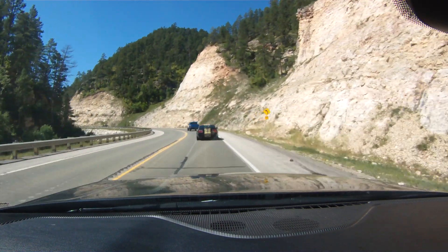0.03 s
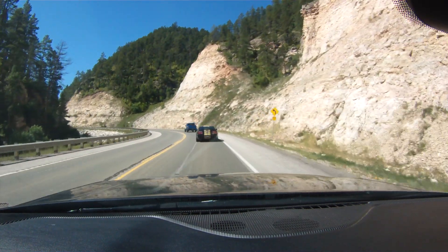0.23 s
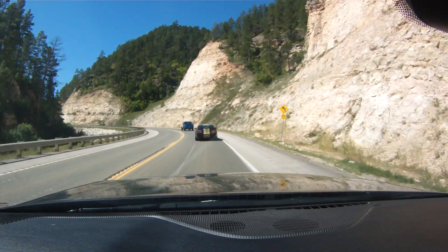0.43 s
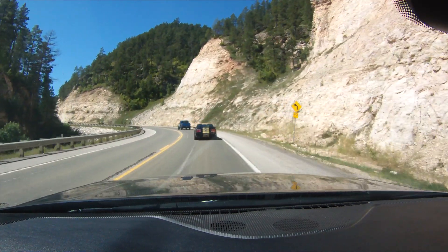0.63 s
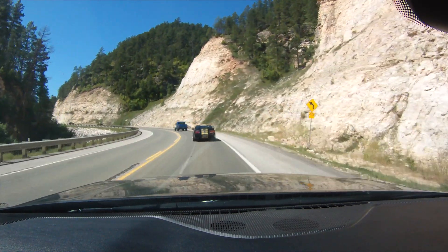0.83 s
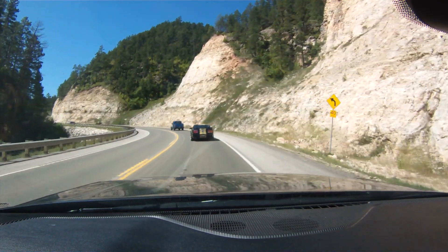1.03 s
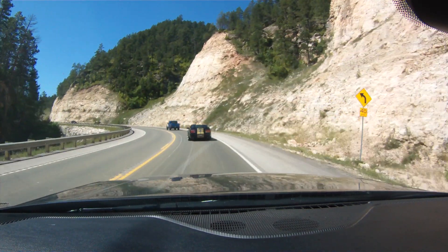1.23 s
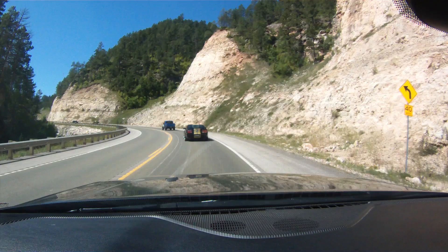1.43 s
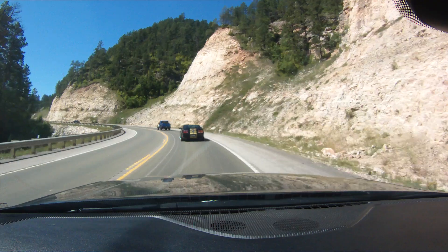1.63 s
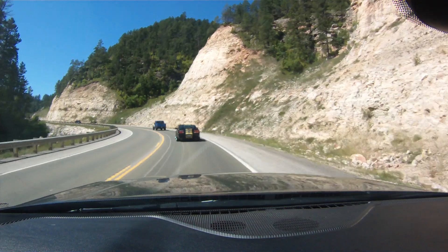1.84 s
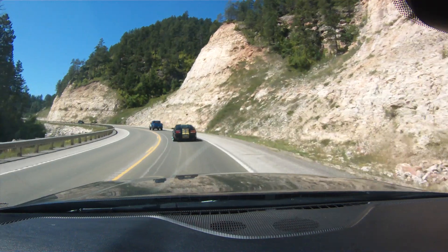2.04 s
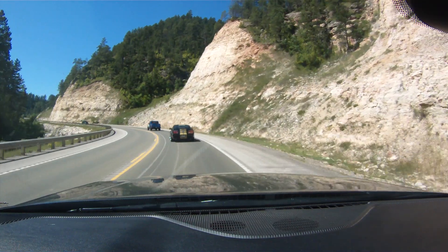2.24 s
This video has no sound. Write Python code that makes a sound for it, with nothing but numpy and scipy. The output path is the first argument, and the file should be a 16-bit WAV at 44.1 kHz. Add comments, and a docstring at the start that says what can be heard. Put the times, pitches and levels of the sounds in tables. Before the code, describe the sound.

Low, dull road roar inside a moving car, mostly below 500 Hz, with unsteady cabin hums and faint tyre and wind hiss. Fairly full at first, with soft body booms near 0.25 and 0.4 s; a tiny dropout with a soft click at 0.41 s. Quieter from 0.45 to 0.9 s, then it swells back by 1.4 s and stays uneven, with barely audible ticks near 2.07 and 2.25 s. Essentially centred.

```python
"""Highway drive heard inside a car

Noise shaped into road roar, tyre hiss and wind hiss swells and sinks, while noise in narrow resonances makes
the cabin hum, the body boom over soft bumps and the windscreen ring. Short dying bursts of band-limited noise
make faint ticks. Each channel adds its own faint hiss; both drop out together for a few milliseconds."""
import sys
import numpy as np
from scipy import signal
from scipy.fft import rfft, irfft
from scipy.io import wavfile
from scipy.ndimage import uniform_filter1d

SR = 44100
rng = np.random.default_rng(int(sys.argv[2]) if len(sys.argv) > 2 else 0)


def wav_record(signal):
    """Record a signal, one row per channel, as 16-bit PCM in the file named by sys.argv[1]."""
    frames = np.transpose(np.atleast_2d(signal))
    bounded = np.clip(frames, -1, 1)
    # unit amplitude maps onto the largest positive 16-bit level
    quanta = np.round(bounded * 32767).astype(np.int16)
    wavfile.write(sys.argv[1], SR, quanta)


N = 100680  # length in samples, about 2.3 s


def from_db(db):
    """Turn decibels into a plain multiplier."""
    return 10 ** (np.asarray(db) / 20)


def rms_one(x):
    """Scale a sound to an average strength (rms) of 1."""
    return x / np.sqrt(np.mean(x ** 2) + 1e-20)


def in_time(rows):
    """Draw straight lines between the rows of a table whose first column is time; one curve per column."""
    times, *columns = np.transpose(rows)
    return [np.interp(np.arange(N) / SR, times, column) for column in columns]


def drift(corner_hz):
    """A slow random wander with spread 1: noise smoothed by two equal low-pass stages."""
    step = 40  # samples between computed points
    pole = np.exp(-2 * np.pi * corner_hz * step / SR)
    noise = rng.standard_normal(N // step + 2002)
    slow = signal.lfilter([1], [1, -2 * pole, pole * pole], noise)[2000:]  # skip the filter's start
    return np.interp(np.arange(N) / step, np.arange(len(slow)), rms_one(slow))


def coloured(spectrum, flicker_db, fall_db):
    """Noise with a given spectrum, falling by fall_db per octave past its ends; its bands flicker in level."""
    hz, db = np.transpose(spectrum)
    low, high = np.log2(hz[0]), np.log2(hz[-1])
    octave = np.log2(np.fft.rfftfreq(N, 1 / SR) + 1)
    outside = np.maximum(low - octave, 0) + np.maximum(octave - high, 0)
    gain_db = np.interp(octave, np.log2(hz), db) - fall_db * outside
    shaped = rfft(rng.standard_normal(N)) * from_db(gain_db)
    out, together = 0, drift(27.0)
    # overlapping bands half an octave apart wander mostly on their own, a little together
    for centre in np.arange(low - 1, high + 1, .5):
        band = np.cos(np.pi * np.clip(octave - centre, -.5, .5)) ** 2
        wander = 0.17 * together + drift(35.0)
        out = out + irfft(shaped * band, N) * from_db(flicker_db * wander)
    return rms_one(out)


STEADINESS = .45  # 0 = pure noise in a resonance, 1 = an even, wavering tone


def resonance(pitch_hz, width_hz):
    """Noise passed twice through one resonance, with its loud and soft lumps partly evened out; rms 1."""
    pole = np.exp(-np.pi * width_hz / SR)
    x = rng.standard_normal(N + SR // 4)
    for _ in range(2):
        x = signal.lfilter([1, 0, -1], [1, -2 * pole * np.cos(2 * np.pi * pitch_hz / SR), pole * pole], x)
    x = rms_one(x[-N:])  # keep the end, after the resonance has built up
    power = uniform_filter1d(x ** 2, size=int(2 * SR / pitch_hz))  # over two cycles
    return rms_one(x / (power + 0.035) ** (STEADINESS / 2))


def peaks(table):
    """Add up resonances, each at its own level."""
    return sum(from_db(db) * resonance(hz, width) for hz, width, db in table)


# Spectrum of the wind hiss: pitch_hz, relative level_db (per Hz)
WIND_SPECTRUM = [(2000, -20), (3400, -1.5), (4230, -1), (4610, -0.5), (5910, -6.5), (12500, -14.5),
                 (15000, -13.5)]


def wind(level_db):
    """Wind hissing on the windscreen: flickering high noise."""
    return from_db(level_db - 0.2) * coloured(WIND_SPECTRUM, flicker_db=1.47, fall_db=40.0)


# Ringing of the windscreen: pitch_hz, width_hz (one pass), level_db (against the ring curve)
GLASS_RINGS = [(1585, 72, -5), (1702, 46, -4.5), (1941, 41, -9), (2190, 75, -8), (2670, 230, -13.5)]


def windscreen_ring(level_db):
    """The windscreen ringing: noise in a few resonances."""
    return from_db(level_db) * peaks(GLASS_RINGS)


# Spectrum of the tyre hiss: pitch_hz, relative level_db (per Hz)
TYRE_SPECTRUM = [(820, -42), (1400, -3), (1690, -2.5), (2100, -0.5), (2730, -3), (3400, -9.5), (4420, -34),
                 (7480, -120)]


def tyres(level_db):
    """Tyre hiss: flickering noise, strongest around 1.4 to 2.7 kHz."""
    return from_db(level_db + 0.8) * coloured(TYRE_SPECTRUM, flicker_db=1.33, fall_db=40.0)


# Faint ticks: start_s, level_db (rms at the start), pitch_hz (band centre), width_octaves
TICKS = [(2.0625, -68, 4500, .4), (2.067, -64, 3400, 1.1), (2.0735, -61.5, 3900, .7),
         (2.079, -65, 3000, .7), (2.2538, -58.5, 6000, 2.8)]
TICK_DECAY_S = .028  # time to die away by 60 dB


def ticks():
    """Faint ticks: short bursts of band-limited noise that die away quickly."""
    out, t = np.zeros(N + SR), np.arange(SR // 20) / SR
    for start_s, level_db, pitch_hz, width_octaves in TICKS:
        edges = pitch_hz * 2 ** (width_octaves * np.array([-.5, .5]))
        edges = np.clip(edges, 100, .45 * SR)
        band = signal.butter(2, edges, "band", fs=SR, output="sos")
        burst = rms_one(signal.sosfilt(band, rng.standard_normal(len(t))))
        start = int(start_s * SR)
        out[start:start + len(t)] += from_db(level_db - 60 * t / TICK_DECAY_S) * burst
    return out[:N]


# Spectrum of the middle of the roar: pitch_hz, relative level_db (per Hz)
MID_SPECTRUM = [(270, -44), (460, 0.5), (517, -0.5), (661, -8.5), (793, -9.5), (1290, -28), (1400, -32),
                (1820, -28), (3080, -120)]


def mid_roar(level_db):
    """The middle of the roar: noise strongest around 500 Hz."""
    return from_db(level_db + 0.14) * coloured(MID_SPECTRUM, flicker_db=0.6, fall_db=48.0)


# Boom of the car body over bumps: time_s, level_db (before the boom's overall level)
BOOM_LEVELS = [(0.02, -55), (0.19, -44), (0.24, -34.5), (0.33, -49), (0.39, -33), (0.55, -53.5),
               (0.57, -40), (0.74, -44), (0.77, -55.5), (1.28, -49), (1.29, -62), (1.55, -42), (1.7, -57),
               (1.78, -37), (1.85, -67), (2.1, -45), (2.17, -65), (2.26, -41)]
BOOM_HZ, BOOM_WIDTH_HZ, BOOM_DB = 41, 20, -5  # pitch, width of one pass, overall level


def body_boom():
    """The body booming over soft bumps: noise in one very low resonance, swelling and sinking."""
    level_db, = in_time(BOOM_LEVELS)
    return from_db(level_db + BOOM_DB) * resonance(BOOM_HZ, BOOM_WIDTH_HZ)


# The strongest cabin hums: pitch_hz, width_hz (one pass)
CABIN_HUMS = [(99, 12.6), (138, 19), (154, 17.2), (178, 19.8), (197, 14.9), (305, 56)]
# How loud each hum is: time_s, then level_db of each hum in turn (before overall level and throb)
HUM_LEVELS = [(0.02, -65, -62, -41, -43, -41, -40), (0.11, -64, -44, -59, -62, -39, -44),
              (0.18, -57, -61, -58, -43.5, -50, -44), (0.23, -50, -40.5, -44, -47, -49, -39),
              (0.28, -41, -39.5, -48, -44, -42, -49), (0.35, -51.5, -46, -68, -49, -44, -43),
              (0.43, -52, -54.5, -58, -57, -46.5, -47), (0.48, -60, -52.5, -52, -53.5, -49, -53.5),
              (0.68, -58.5, -62.5, -70, -58.5, -69, -55.5), (0.81, -59.5, -54.5, -62, -53, -55, -51),
              (1.21, -46, -49.5, -56.5, -58, -48.5, -48.5), (1.32, -59.5, -64, -60, -46, -48, -49),
              (1.4, -52.5, -47, -49, -50.5, -51.5, -47), (1.52, -45, -58, -43.5, -51, -37.5, -46),
              (1.56, -42, -49, -47, -53, -49, -45.5), (1.62, -44, -54, -41, -45, -41.5, -46.5),
              (1.73, -48.5, -57, -40.5, -55, -51, -39), (1.77, -59, -48.5, -46, -55.5, -49.5, -43),
              (2.05, -54, -44.5, -50, -49, -48, -49.5), (2.11, -54, -55, -55, -53, -46, -45.5),
              (2.19, -49, -42.5, -48, -52, -50.5, -53), (2.27, -57, -61, -61, -49, -40.5, -40)]
HUMS_DB = -1  # overall level
THROB_SPAN_S, THROB_SHARE = 0.34, 0.38  # averaging span; how much of the low roar's throb the hums share


def cabin_hums(low_db):
    """The cabin's low resonances humming: noise in each, throbbing partly along with the low roar."""
    # quick changes are what is left after taking away the running average
    throb_db = THROB_SHARE * (low_db - uniform_filter1d(low_db, int(THROB_SPAN_S * SR)))
    out = 0
    for (pitch_hz, width_hz), level_db in zip(CABIN_HUMS, in_time(HUM_LEVELS)):
        out = out + from_db(level_db + HUMS_DB + throb_db) * resonance(pitch_hz, width_hz)
    return out


# Spectrum of the low road roar: pitch_hz, relative level_db (per Hz)
ROAD_SPECTRUM = [(15, -26), (25, -19), (62, -8), (80, -12.5), (120, -5.5), (189, -4.5), (240, -8.5),
                 (335, -1.5), (417, -14), (460, -19), (600, -32.5), (1010, -120)]
# Weaker resonances riding on the low roar: pitch_hz, width_hz (one pass), level_db (against its curve)
PANEL_RESONANCES = [(29.6, 64, -36.5), (67.8, 36, -29.5), (358, 75, -11.5), (383.6, 26, -17)]


def road_roar(level_db):
    """Low road roar: a broad bed of noise plus weaker resonances, all following one level curve."""
    bed = from_db(-3.5) * coloured(ROAD_SPECTRUM, flicker_db=0.9, fall_db=22.0)
    return from_db(level_db) * (bed + peaks(PANEL_RESONANCES))


# Swell of the roar, before each layer's own level:
# time_s, low_roar_db, mid_roar_db, tyre_hiss_db, windscreen_ring_db, wind_hiss_db
ROAR_LEVELS = [(0.02, -35.5, -48.5, -65, -66.5, -71), (0.1, -36, -49.5, -67, -70, -72),
               (0.12, -35.5, -47.5, -67, -70, -71.5), (0.17, -39.5, -49.5, -65.5, -64, -73),
               (0.22, -33, -45.5, -64.5, -62, -71), (0.27, -41, -51.5, -66.5, -68, -72),
               (0.35, -35.5, -51.5, -68.5, -73, -73.5), (0.43, -45.5, -53.5, -72, -71, -80),
               (0.44, -41, -62, -72, -74, -79), (0.47, -40, -55, -72.5, -82, -81),
               (0.5, -45, -57, -74.5, -78.5, -81), (0.77, -50, -59.5, -77, -78, -84),
               (0.85, -42, -55, -74, -83, -81), (0.87, -49, -57.5, -76.5, -79, -80.5),
               (1.0, -41, -52.5, -70, -74, -78.5), (1.07, -42.5, -57, -72, -71, -78.5),
               (1.13, -43, -51, -69, -75, -73.5), (1.16, -43.5, -54.5, -68, -74, -78),
               (1.26, -37.5, -52.5, -71.5, -75, -76), (1.28, -43.5, -57, -70, -72, -75.5),
               (1.38, -35, -48.5, -66, -64, -71.5), (1.41, -37, -50.5, -66, -62, -71.5),
               (1.52, -38, -47, -63.5, -69.5, -71.5), (1.55, -36.5, -46.5, -66, -66, -71),
               (1.65, -40, -52.5, -66, -68, -72), (1.68, -42, -45.5, -66, -71, -71),
               (1.7, -41.5, -54.5, -66, -74, -70.5), (1.74, -37.5, -48, -66.5, -64.5, -70.5),
               (1.83, -41.5, -54, -68, -70, -76.5), (1.88, -36.5, -49, -66, -72, -74),
               (1.9, -41.5, -52, -69.5, -68.5, -75.5), (2.08, -40.5, -48.5, -67, -69, -72),
               (2.1, -40.5, -50.5, -68.5, -71, -74), (2.24, -38, -50.5, -65.5, -73, -71.5)]


def cabin():
    """All the steady noise in the cabin; five layers follow the swell table."""
    low_db, mid_db, tyre_db, ring_db, wind_db = in_time(ROAR_LEVELS)
    high = wind(wind_db) + windscreen_ring(ring_db) + tyres(tyre_db)
    low = mid_roar(mid_db) + body_boom() + cabin_hums(low_db) + road_roar(low_db)
    return high + low


def scene():
    """The same sound in both channels."""
    return (cabin() + ticks()) * np.ones((2, 1))


# Spectrum of each channel's own hiss: pitch_hz, relative level_db (per Hz)
HISS_SPECTRUM = [(60, -14), (125, -16), (250, -18), (500, -6), (1000, 3), (2000, -1.5), (4000, -3.5),
                 (8000, -9), (12000, -11), (15000, -27)]
HISS_DB = -76  # rms level


def channel_hiss():
    """Faint hiss made separately for each of the two channels."""
    hiss = [coloured(HISS_SPECTRUM, flicker_db=1.0, fall_db=0.0) for _ in range(2)]
    return from_db(HISS_DB) * np.array(hiss)


DROP_START_S, DROP_LENGTH_S, DROP_RETURN_S = .4106, .0043, .0006
DROP_SETTLE_S, DROP_REST = .0008, -.006  # time constant of the slide; resting value (full scale is 1)
BUMP_HEIGHT, BUMP_LENGTH_S = .019, .0028  # soft bump on the return (full scale is 1)


def dropout(sound):
    """The signal slides to a resting value, fades back in and gets a soft half-sine bump."""
    out = sound.copy()
    start = int(DROP_START_S * SR)
    t = np.arange(int((DROP_LENGTH_S + DROP_RETURN_S) * SR)) / SR
    gap = slice(start, start + len(t))
    held = DROP_REST + (out[:, start:start + 1] - DROP_REST) * np.exp(-t / DROP_SETTLE_S)
    back = np.sin(np.pi / 2 * np.clip((t - DROP_LENGTH_S) / DROP_RETURN_S, 0, 1)) ** 2
    out[:, gap] = (1 - back) * held + back * out[:, gap]
    end = start + int(DROP_LENGTH_S * SR)
    swing = np.arange(int(BUMP_LENGTH_S * SR)) / SR
    out[:, end:end + len(swing)] += BUMP_HEIGHT * np.sin(np.pi * swing / BUMP_LENGTH_S)
    return out


CUTOFF_HZ = 15100


def record(dry):
    """Add each channel's hiss, then the dropout, then cut the top steeply."""
    out = dropout(dry + channel_hiss())
    top_cut = signal.ellip(12, .3, 70, CUTOFF_HZ, fs=SR, output="sos")  # .3 dB ripple, 70 dB cut
    return signal.sosfilt(top_cut, out)


dry = scene()
out = record(dry)
wav_record(out)
```